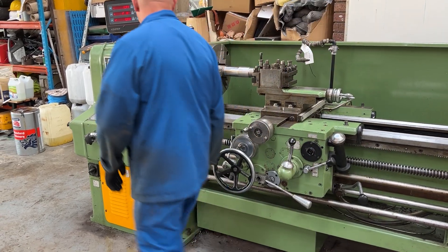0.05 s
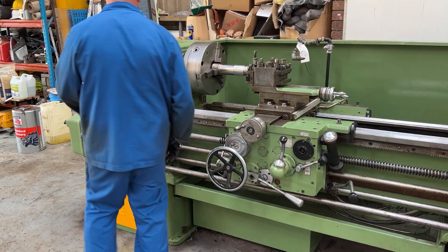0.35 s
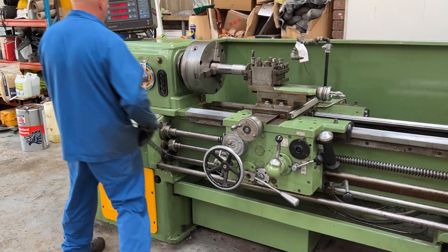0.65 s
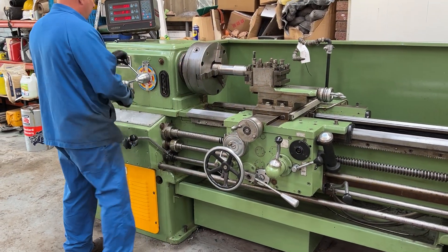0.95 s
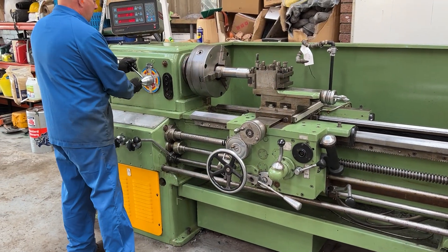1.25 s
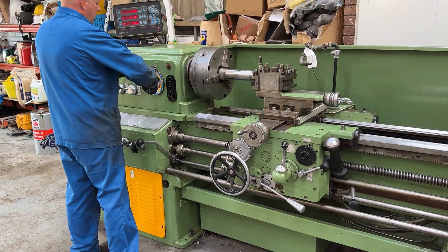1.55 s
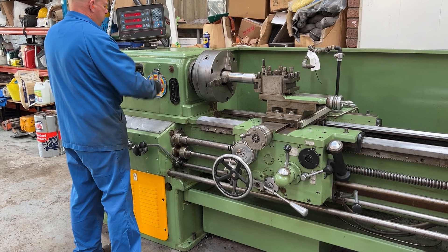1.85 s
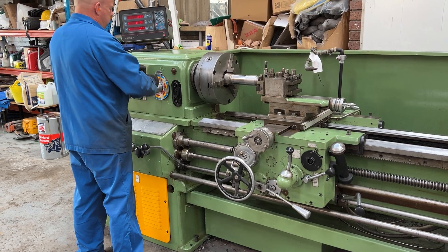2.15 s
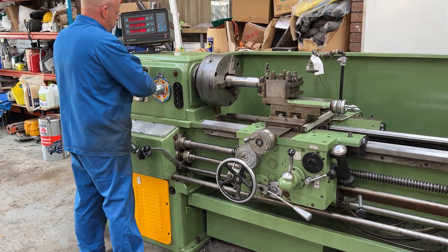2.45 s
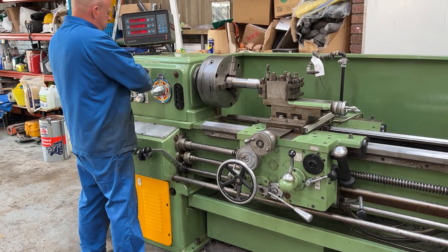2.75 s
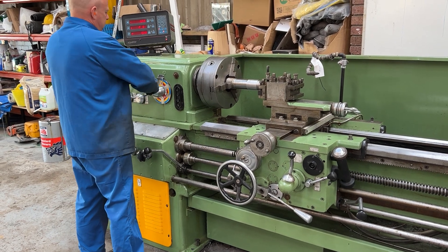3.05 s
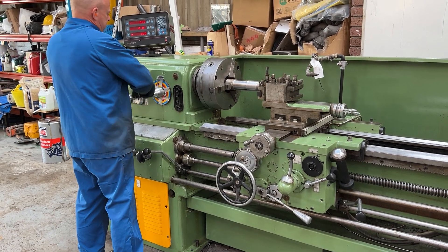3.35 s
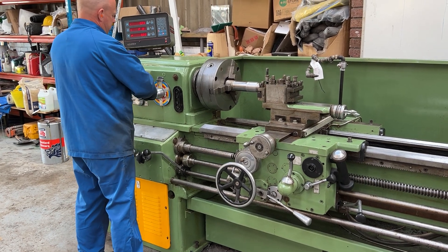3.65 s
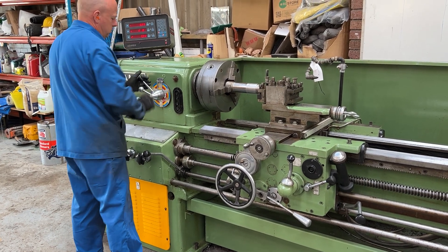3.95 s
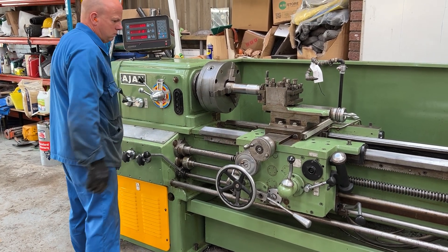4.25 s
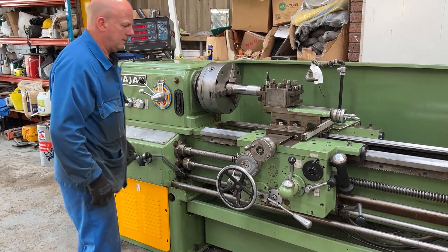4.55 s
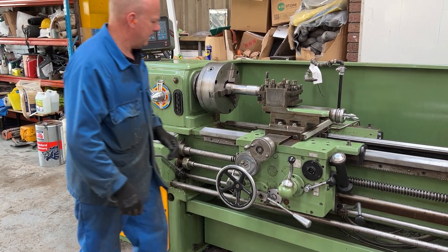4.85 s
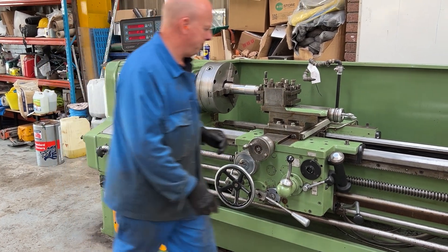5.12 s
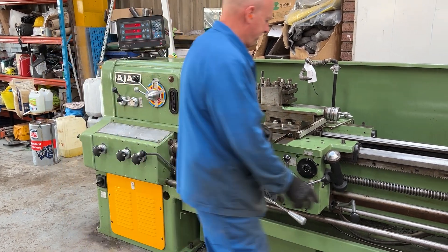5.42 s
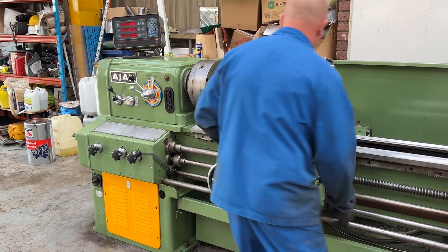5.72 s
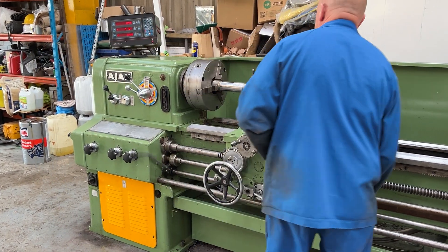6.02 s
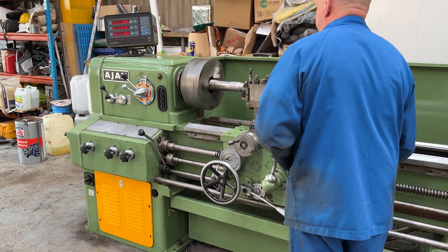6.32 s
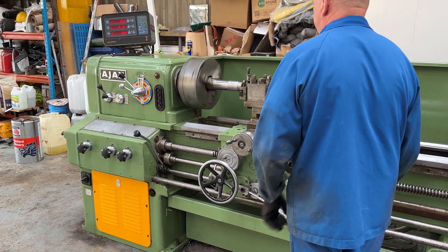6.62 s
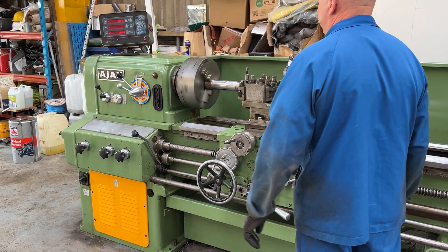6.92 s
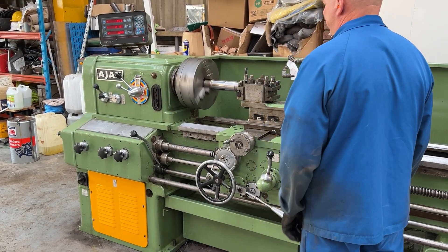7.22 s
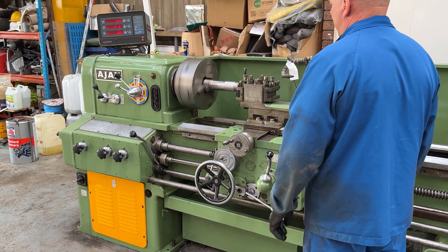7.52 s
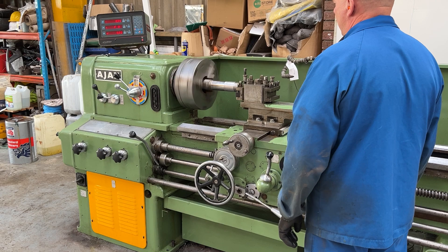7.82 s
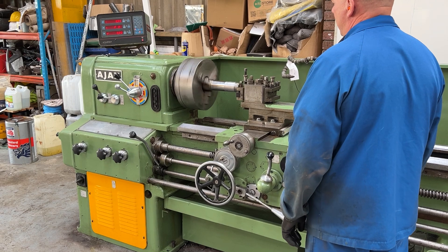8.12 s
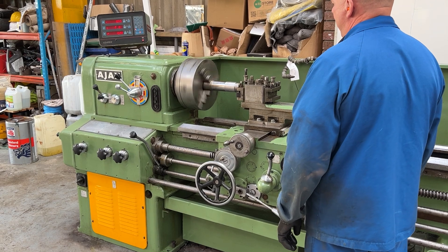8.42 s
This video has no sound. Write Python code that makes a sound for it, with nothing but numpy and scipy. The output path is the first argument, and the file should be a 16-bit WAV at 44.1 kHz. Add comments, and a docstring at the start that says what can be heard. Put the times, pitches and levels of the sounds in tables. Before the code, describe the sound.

Workshop lathe humming and whining as gear levers clack, until a heavy clunk and brief grind bring the spindle up to a louder, pulsing whine.

```python
"""A centre lathe idles in a workshop: its motor hums and its input gears whine as their teeth mesh.
The operator moves about and shifts the speed levers; latches click and gears clash in the casting.
He passes in front, briefly shading the whine, and pulls the clutch. Friction takes up the drive with
a clunk, the motor sags under the load, and the spindle gears run up to a louder whine, which throbs
once a shaft turn because some of the gears run off centre."""
import sys
import numpy as np
from scipy import signal
from scipy.fft import rfft, irfft, next_fast_len
from scipy.io import wavfile

SR = 44100
rng = np.random.default_rng(int(sys.argv[2]) if len(sys.argv) > 2 else 0)


def log_audio(samples):
    """Write samples as a 16-bit WAV file to the path given in sys.argv[1]."""
    # one column per channel
    frames = np.atleast_2d(samples).T
    # limit to full scale, then quantise
    limited = np.clip(frames, -1, 1)
    pcm = np.round(limited * 32767).astype(np.int16)
    wavfile.write(sys.argv[1], SR, pcm)


N = 382347
TIME = np.arange(N) / SR
DRAG_S, LOCK_S = 6.08, 6.36  # the clutch starts to drag, then locks


def gain_of(db):
    """Amplitude ratio of a level in decibels."""
    return 10 ** (np.asarray(db) / 20)


def curve_at(points, hz):
    """Interpolation of a table on a logarithmic frequency axis."""
    freqs, values = np.transpose(points)
    return np.interp(np.log(hz + 1), np.log(freqs + 1), values)


def tilted(spectrum, tilt_db):
    """Spectral tilt of tilt_db per octave, pivoting at 7 kHz."""
    return [(hz, level + tilt_db * np.log2(hz / 7000)) for hz, level in spectrum]


def hiss():
    """White noise in two independent channels."""
    return rng.standard_normal((2, N))


def wander(rate_hz):
    """Random modulation of unit variance, mostly below rate_hz."""
    knots = np.arange(0, TIME[-1] + 1, .5 / rate_hz)
    return np.interp(TIME, knots, rng.standard_normal(len(knots))) / np.sqrt(2 / 3)


def bump(middle_s, half_s):
    """Gaussian swell of height 1."""
    return np.exp(-((TIME - middle_s) / half_s) ** 2)


def ramp(start_s, rise_s):
    """Linear rise from 0 to 1, then held."""
    return np.clip((TIME - start_s) / rise_s, 0, 1)


def decay(start_s, t60_s):
    """Exponential decay from a sudden onset, 60 dB in t60_s."""
    return (TIME >= start_s) * np.exp(-np.log(1000) * np.clip((TIME - start_s) / t60_s, 0, 3))


def power_sum(envelopes):
    """Incoherent sounds add in power, not in amplitude."""
    return np.sqrt(sum(envelope ** 2 for envelope in envelopes))


def ring(modes, start_s):
    """Free vibration of a struck body: a sum of damped sinusoids."""
    live = (TIME > start_s) & (TIME < start_s + 1)
    age = TIME[live] - start_s
    out = np.zeros(N)
    for hz, db, t60_s in modes:
        out[live] += np.sqrt(2) * gain_of(db - 60 * age / t60_s) * np.sin(2 * np.pi * hz * age)
    return out


def colour(drive, spectrum, modes=()):
    """Source and filter: two noises pass a resonant body and arrive as a partly coherent stereo pair."""
    # likeness of the two channels: frequency_hz, coherence
    likeness = [(60, 1), (130, .98), (300, .95), (800, .85), (1500, .45), (2000, .6), (2500, .88),
                (3500, .5), (5000, .5), (5800, .8), (9500, .9), (15000, .8)]
    # balance of the channels: frequency_hz, left_over_right_db
    balance = [(60, .3), (250, .5), (700, 1.8), (1300, 3.6), (1850, 5), (2250, -.5), (3100, -2.5),
               (4800, -2.5), (5600, -5.3), (7300, 0)]
    # phase between the channels: frequency_hz, left_lead_rad
    lead = [(200, 0), (800, -.25), (1600, .4), (2200, -.35), (4600, -.55), (5500, -3.6), (7000, -3.2),
            (8600, -.4), (10300, 0), (12000, 3), (13600, 3.3), (15200, 6.2)]
    size = next_fast_len(N + SR // 4)
    hz = np.fft.rfftfreq(size, 1 / SR)
    resonance_db = sum(lift / (1 + (2 * (hz - centre) / width) ** 2) for centre, width, lift in modes)
    low_cut = np.minimum(hz / spectrum[0][0], 1)
    response = gain_of(curve_at(spectrum, hz) + resonance_db) * low_cut
    left, unrelated = rfft(drive, size)
    coherence = np.clip(curve_at(likeness, hz), 0, 1)
    right = coherence * left + np.sqrt(1 - coherence ** 2) * unrelated
    right *= np.exp(-1j * curve_at(lead, hz))
    lean = gain_of(curve_at(balance, hz) / 2)
    pair = np.array([left * lean, right / lean])
    return irfft(pair * response, size)[:, :N] * np.sqrt(SR / 2)


def gear_tones(tones, speed, flutter, flutter_hz, drift_rad, swing_rad=0):
    """Tooth meshing: pitch follows shaft speed, and uneven teeth modulate amplitude and phase."""
    phase_per_hz = 2 * np.pi * np.cumsum(speed) / SR
    out = np.zeros((2, N))
    for hz, db, lean_db, lead_rad in tones:
        phase = hz * phase_per_hz + swing_rad + rng.uniform(0, 2 * np.pi)
        phase += flutter * wander(flutter_hz) + drift_rad * wander(2)
        amplitude = np.sqrt(2) * gain_of(db) * (1 + flutter * wander(flutter_hz))
        out[0] += amplitude * gain_of(lean_db / 2) * np.sin(phase)
        out[1] += amplitude / gain_of(lean_db / 2) * np.sin(phase - lead_rad)
    return out


def input_drive(speed, shaft_hz=25.13, wobble_depth=0.086, buzz_depth=0.03, crossover_hz=2200):
    """Motor and gear tones, amplitude-modulated once a turn, sound over broadband friction noise."""
    # motor and input gear tones: pitch_hz, level_db, left_over_right_db, left_lead_rad
    idle_tones = [(74.5, -48, 0, 0.0), (146.8, -51, -1, -0.2), (299.8, -45, 1, -0.2), (464, -55, -1, 0.2),
                  (586.8, -60, 2, 0.1), (638.7, -51, 3, 0.1), (746.5, -57, 0, -1.0), (846.5, -35, 3, -0.3),
                  (853.8, -49, 2, -0.2), (870.8, -55, 2, 0.1), (946.5, -56, -4, 0.2), (961.2, -57, 2, -0.1),
                  (1068.8, -59, 5, 0.7), (1283.8, -62, 8, 0.9), (1391.2, -57, 6, -0.3), (1487, -58, 5, 0.7),
                  (1606.2, -62, 9, -0.9), (1713.8, -59, 2, 1.2), (1821.5, -62, 11, -0.6),
                  (1839.8, -61, 6, 0.7), (2103.2, -65, 0, -1.1), (2224, -67, 0, 0), (2249, -67, 0, 0),
                  (2264, -65, 0, 0.1), (2555, -67, 0, -.3), (2586.2, -61, 0, -0.3),
                  (2686.2, -58.5, 0, -0.5), (2793, -70, 0, -.3), (3765, -74, -8, -0.7),
                  (4161, -78, -3, -.5), (4519.5, -79, -7, 0.1), (5272.2, -73, -3, 2.1)]
    # wash of belts, bearings and oil: frequency_hz, density_db
    wash_spectrum = [(22, -87.5), (45, -69.5), (70, -59.5), (200, -68.5), (350, -64.5), (700, -72),
                     (1000, -73), (1800, -75.5), (2450, -84.5), (3000, -88.5), (4300, -94), (8500, -105),
                     (15500, -116)]
    # casting resonances in the wash: centre_hz, width_hz, lift_db
    wash_modes = [(133, 42, 2.9), (244, 58, 4.1), (306.6, 6, 7.8), (478, 33, 4.1), (852, 17, 3.9),
                  (906, 237, 5.4), (1401, 18, 6.1), (3670, 560, 4.8), (5970, 1070, 7.4)]
    # the operator shadows the direct path as he passes, then reflects sound from beside it
    path_db = -9.5 * bump(5.59, 0.34) + 1.5 * bump(7.15, 0.9)
    entry_shadow = gain_of(-2.5 * bump(.15, .35))  # walking in, his back hides the hiss
    *faint, loudest = sorted(idle_tones, key=lambda tone: tone[1])
    mesh = gear_tones([loudest], speed, flutter=0.042, flutter_hz=30.6, drift_rad=.04)
    whine = gear_tones(faint, speed, flutter=0.11, flutter_hz=22.2, drift_rad=0.085)
    wobble = 1 + wobble_depth * np.sin(2 * np.pi * shaft_hz * np.cumsum(speed) / SR)
    mains_buzz = 1 + buzz_depth * np.sin(2 * np.pi * 100 * TIME)
    treble = signal.sosfilt(signal.butter(2, crossover_hz, "high", fs=SR, output="sos"), hiss())
    body = signal.sosfilt(signal.butter(2, crossover_hz, "low", fs=SR, output="sos"), hiss())
    friction = body * gain_of(0.62 * wander(14)) + treble * mains_buzz * entry_shadow
    wash = colour(friction, wash_spectrum, wash_modes)
    return (mesh * gain_of(path_db) + whine) * wobble + wash * gain_of(0.047 * path_db)


def operator(grain_db=1.5, scuff_rise_s=0.024, step_s=5.151):
    """Sliding friction of cloth and soles makes grainy noise; one boot lands with a damped impact."""
    # rustle of cloth and soles: frequency_hz, density_db
    cloth = [(500, -89), (1800, -71), (4000, -82.5), (7000, -88.5), (10000, -94.5), (15500, -102)]
    # swishes of the overalls: middle_s, half_length_s, level_db
    swishes = [(.61, .07, -15), (.8, .06, -14), (1.12, 0.32, -13.5), (1.72, .12, -13), (5.776, 0.1, -5.5),
               (6.037, 0.093, -4), (6.144, 0.048, -2.5), (6.64, 0.05, -6)]
    # soles scuffing concrete: start_s, level_db, t60_s, tilt_db_per_octave
    scuffs = [(.865, 2.5, 0.46, 1), (5.042, 2.5, 0.14, 8)]
    # a boot landing on concrete: frequency_hz, density_db
    boot = [(50, -68), (130, -46.5), (400, -57), (700, -57), (1500, -79), (8000, -125)]
    grains = gain_of(grain_db * wander(160))
    swells = sum(gain_of(db) * bump(middle_s, half_s) for middle_s, half_s, db in swishes)
    out = colour(hiss() * grains * swells, cloth)
    for start_s, db, t60_s, tilt_db in scuffs:
        envelope = gain_of(db) * ramp(start_s, scuff_rise_s) * decay(start_s, t60_s)
        out += colour(hiss() * grains * envelope, tilted(cloth, tilt_db))
    return out + colour(hiss() * decay(step_s, t60_s=0.035), boot)


def levers(tail_t60_s=0.99, grip_s=5.7618):
    """Impacts excite steel resonances: latches snap home and ring on, and the gripped handle clinks."""
    # latch clicks of the speed and clutch levers: start_s, level_db, t60_s, tilt_db_per_octave
    clicks = [(1.309, -14.5, 0.022, -6.5), (3.1213, 1, 0.025, 4.5), (3.142, -1.5, 0.045, 1.5),
              (3.403, 0, 0.027, 3), (3.425, -8.5, .03, -1), (6.0167, -14.5, 0.029, -8),
              (6.054, -3, 0.019, 3.5)]
    # crack of a latch, and its faint tail: frequency_hz, density_db
    latch = [(500, -90), (2100, -63), (3200, -66), (5000, -71.5), (7300, -71.5), (9000, -75),
             (11500, -72.5), (15500, -80)]
    latch_tail = [(1000, -112), (2100, -86), (3200, -88.5), (7000, -99), (9000, -99), (11000, -105),
                  (15500, -111)]
    # resonances of the steel lever: centre_hz, width_hz, lift_db
    lever_modes = [(2110, 90, 6.9), (4150, 200, 9), (6400, 420, 12), (8950, 560, 8.2), (11800, 700, 5)]
    # lever modes that ring on: pitch_hz, level_db, t60_s
    lever_ring = [(4170, -66, .35), (6400, -66, .5), (8880, -71, .5)]
    # clink of the clutch handle, and its faint ring: frequency_hz, density_db
    handle = [(800, -70), (2500, -73), (3050, -53.5), (3700, -60.5), (4200, -61.5), (5200, -74),
              (9000, -76), (15500, -94)]
    handle_ring = [(2500, -105), (3150, -84), (3800, -81), (4250, -74), (4500, -93), (8000, -115)]
    out = colour(hiss() * decay(grip_s, t60_s=.035), handle)
    out += colour(hiss() * decay(grip_s, t60_s=0.48), handle_ring)
    for start_s, db, t60_s, tilt_db in clicks:
        crack = colour(hiss() * decay(start_s, t60_s), tilted(latch, tilt_db), lever_modes)
        out += gain_of(db) * (crack + ring(lever_ring, start_s))
    tails = power_sum(gain_of(db) * decay(start_s, tail_t60_s) for start_s, db, _, _ in clicks)
    return out + colour(hiss() * tails, latch_tail, lever_modes)


def gearbox(bite_s=6.11, clunk_s=6.143, shudder_db=2, thud_db=-20):
    """Structure-borne sound: blows of dogs, gears and clutch set the casting and the bed vibrating."""
    # dogs skip and drop in, then the clutch takes up the backlash: start_s, thump_db, clank_db, t60_s
    knocks = [(1.927, -21, -2, .05), (1.935, -8, -8, .14), (1.95, -13, -1, 0.08), (1.959, -2.5, -2.5, 0.16),
              (1.98, -11, -8, 0.16), (3.16, -16, -7.5, .11), (6.063, -9, 0, .13), (6.114, 0.5, -2, .19),
              (6.145, 1.5, -1.5, .19), (6.292, -2, -4.5, .26), (6.353, 0.5, -7, .17), (6.363, -0.5, 6, .19),
              (6.43, -4.5, -1, 0.072), (6.597, -7, 5.5, .11)]
    # thump of the casting, clank of the teeth, shudder of the bed: frequency_hz, density_db
    casting = [(40, -72), (100, -56), (180, -63), (260, -57), (370, -50), (480, -52.5), (590, -52),
               (750, -65.5), (1050, -67), (2200, -84), (9000, -120)]
    teeth = [(400, -89.5), (900, -59), (1200, -58.5), (1530, -56), (1900, -65), (2300, -74), (4000, -90),
             (9000, -107), (15500, -130)]
    bed = [(30, -79), (70, -56), (110, -50), (170, -52), (250, -58), (400, -77.5), (900, -100),
           (5000, -150)]
    # modes of the casting and of the bed: pitch_hz, level_db, t60_s
    casting_modes = [(368, -28, .15), (475, -30.5, .1), (588, -31, 0.097), (1530, -37, .07)]
    bed_modes = [(105.3, -35, 0.54), (150.4, -31.5, .6), (200, -34, .5), (296, -38, .45)]
    # booms of the casting, loudest as the gears ease into mesh: middle_s, length_s, pitch_hz, level_db
    booms = [(2.364, 0.14, 73.1, -34.5), (2.703, 0.15, 74, -30), (6.43, .07, 125, -34), (7.14, .3, 80, -38)]
    thumps = power_sum(gain_of(db) * decay(start_s, t60_s) for start_s, db, _, t60_s in knocks)
    clanks = power_sum(gain_of(db) * decay(start_s, t60_s) for start_s, _, db, t60_s in knocks)
    bite = gain_of(shudder_db) * ramp(bite_s, rise_s=0.055) * decay(bite_s, t60_s=2.7)
    shudder = bite + gain_of(thud_db) * thumps
    out = colour(thumps * hiss(), casting) + colour(clanks * hiss(), teeth)
    out += colour(shudder * hiss(), bed)
    out += sum(gain_of(db) * ring(casting_modes, start_s) for start_s, db, _, _ in knocks)
    out += ramp(clunk_s, rise_s=.012) * ring(bed_modes, clunk_s)
    for middle_s, length_s, hz, db in booms:
        swell = gain_of(db) * bump(middle_s, length_s / np.sqrt(8))
        out += swell * np.sqrt(2) * np.sin(2 * np.pi * hz * TIME)
    return out


def rumble(start_s=2.2, end_s=4.4, fade_s=.3):
    """Low-frequency noise swells in the machine while the speed levers are worked."""
    # rumble of the machine: frequency_hz, density_db
    spectrum = [(25, -80), (55, -65), (100, -69.5), (140, -60.5), (185, -79), (600, -120)]
    return colour(hiss() * (ramp(start_s, fade_s) - ramp(end_s, fade_s)), spectrum)


def clutch(first_speed=.3, grip_power=1.5, settle_s=0.049):
    """Friction coupling: gear speed (share of full) and load (0-1) rise until lock; then load decays."""
    grip = ramp(DRAG_S, LOCK_S - DRAG_S) ** grip_power
    load = grip * np.exp(-np.maximum(TIME - LOCK_S, 0) / settle_s)
    return first_speed + (1 - first_speed) * grip, load


def spindle(speed, load, shaft_hz=14.64, db_per_decade=53, load_db=1, rattle_db=1.0, chatter_db=3):
    """Gear noise grows with speed and load; teeth rattle in the backlash, eccentricity makes a throb."""
    # spindle gear tones at full speed: pitch_hz, level_db, left_over_right_db, left_lead_rad
    steady_tones = [(395.8, -48, 0, -.5), (465.5, -44, 2, .3), (941.2, -50, -1, .1), (958.5, -38.5, 1, .7),
                    (1040.5, -49, 3, -.6), (1070.2, -41.5, 5, .7), (1088, -47, 7, .5), (1155.2, -48, 1, .6),
                    (1404, -47, 3, .7), (1568.5, -43, 5, 1.8), (1862.2, -54, 5, .6), (1917, -41.5, 6, 1.4),
                    (1921.2, -52, 5, 1.3), (2083, -58, 2, 0), (2638.8, -54.5, -4, 0), (2875, -53, 0, -.1),
                    (3329.2, -65, -1, -.1), (3579.8, -66, -4, -.7), (3837, -63, -1, -.1),
                    (3908.5, -63.5, -2, .1), (4791, -74, -2, -.5)]
    # off-centre gears: pitch_hz, level_db, left_over_right_db, left_lead_rad,
    # pulse_depth, swing_rad, pulse_lag_turns, swing_lag_turns, build_s
    eccentric_tones = [(453.1, -34.6, 2, -.1, .74, -.6, .016, -.07, .6),
                       (1319.7, -33.6, 5.5, -.3, .66, 1.0, -.16, -.03, .25)]
    # churn of the gears: frequency_hz, density_db
    churn_spectrum = [(22, -94), (100, -65.5), (250, -74.5), (400, -69.5), (650, -70.5), (1000, -60.5),
                      (1450, -61), (2200, -70.5), (3000, -76), (3450, -82), (4000, -87.5), (5200, -84.5),
                      (9000, -104.5), (15500, -122)]
    # headstock resonances: centre_hz, width_hz, lift_db
    headstock_modes = [(372.5, 44, 12), (445, 120, 5.6), (445, 28, 7.8), (587, 115, 9.4), (833, 32, 8),
                       (1327, 70, 7.7), (1560, 275, 6.2), (1910, 19, 5.2), (3860, 480, 5)]
    # tooth chatter at the tight spot of each turn: frequency_hz, density_db
    chatter_spectrum = [(2500, -100), (3000, -79.5), (3450, -89), (3850, -75), (4200, -84.5), (5000, -100),
                        (9000, -125)]
    level = gain_of(0.3 + db_per_decade * np.log10(speed) + load_db * load) * ramp(DRAG_S, rise_s=.06)
    angle = 2 * np.pi * shaft_hz * (TIME - LOCK_S) + 0.2 * wander(4.2)
    tightness = np.cos(angle)
    whine = gear_tones(steady_tones, speed, flutter=0.17, flutter_hz=20, drift_rad=.1)
    whine *= 1 + .12 * tightness
    for *tone, depth, swing_rad, pulse_lag, swing_lag, build_s in eccentric_tones:
        turn = angle - 2 * np.pi * pulse_lag
        pulse = 1 + depth * (np.cos(turn) + 0.1 * np.cos(2 * turn))  # the harmonic sharpens the crest
        swing = swing_rad * np.sin(angle - 2 * np.pi * swing_lag)
        mesh = gear_tones([tone], speed, flutter=0.24, flutter_hz=7, drift_rad=0.1, swing_rad=swing)
        whine += ramp(DRAG_S, build_s) * pulse * mesh
    rattle = hiss() * level * gain_of(rattle_db * wander(90) + 0.1 * tightness)
    churn = colour(rattle, churn_spectrum, headstock_modes)
    chatter = colour(hiss() * level * gain_of(chatter_db * (tightness - 1)), chatter_spectrum)
    return whine * level + churn + chatter


def grind(speed, slip_s=6.26, strain_s=6.33, judder_db=2):
    """Sliding friction: the clutch plates rub and judder, and strained teeth rise in pitch until lock."""
    # rub of the slipping plates: frequency_hz, density_db
    plates = [(50, -72), (110, -64), (220, -58.5), (330, -63.5), (560, -60), (800, -68), (1500, -72),
              (2400, -79), (3500, -94), (9000, -118)]
    # grinding meshes: full_speed_pitch_hz, level_db, left_over_right_db, left_lead_rad
    strained_tones = [(1074, -39, 4, .4), (1340, -40, 5, 0), (1568, -41, 5, .8), (2620, -37, 1, 0)]
    rub = colour(hiss() * bump(slip_s, half_s=.075) * gain_of(judder_db * wander(60)), plates)
    strain = gear_tones(strained_tones, speed, flutter=0.9, flutter_hz=299.4, drift_rad=.1)
    return rub + bump(strain_s, half_s=0.047) * strain


def scene(motor_sag=0.0081):
    """Superposition of lathe and operator; the clutch load slows the motor and all the gears it drives."""
    spindle_share, load = clutch()
    motor_speed = 1 - motor_sag * load
    spindle_speed = spindle_share * motor_speed
    drivetrain = input_drive(motor_speed) + spindle(spindle_speed, load) + grind(spindle_speed)
    return drivetrain + gearbox() + rumble() + levers() + operator()


def record(dry, cutoff_hz=15900):
    """Band limiting: the ends are tapered and a low-pass filter removes the highest treble."""
    faded = dry * signal.windows.tukey(N, .001)
    low_pass = signal.firwin(511, cutoff_hz, window=("kaiser", 9), fs=SR)
    return signal.oaconvolve(faded, low_pass[None], "same")


dry = scene()
out = record(dry)
log_audio(out)
```